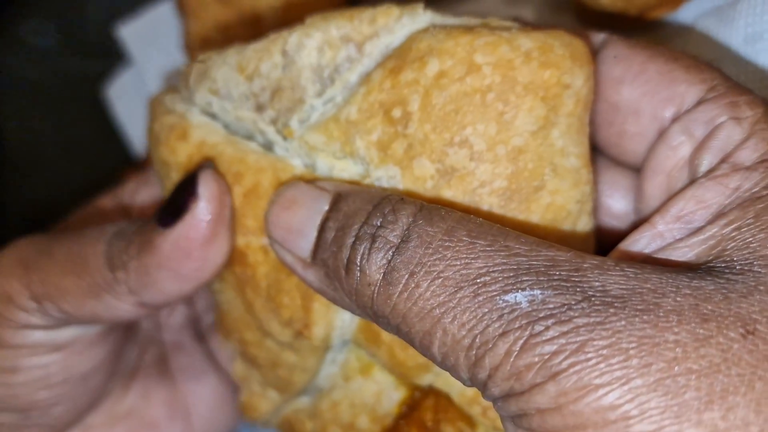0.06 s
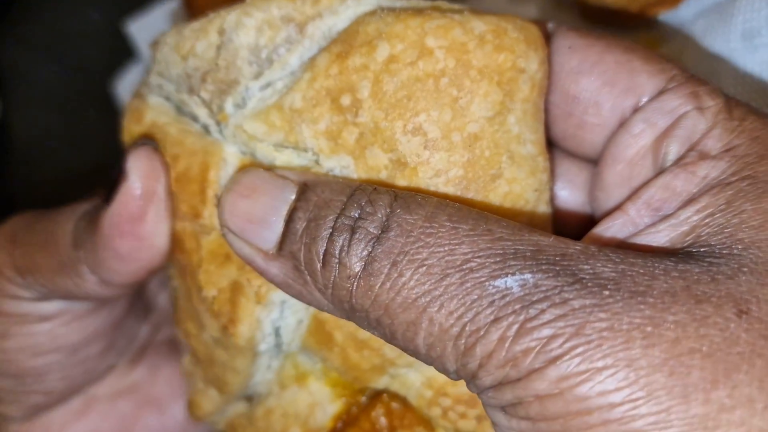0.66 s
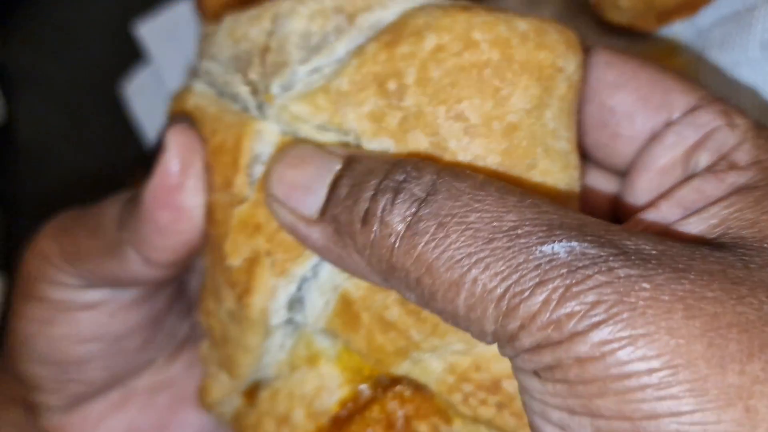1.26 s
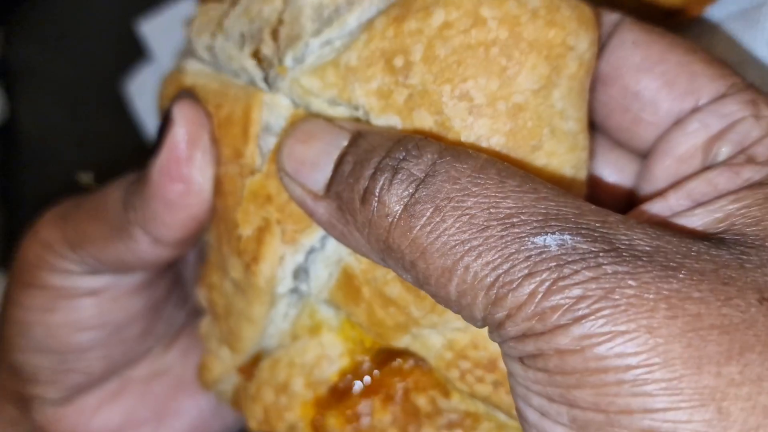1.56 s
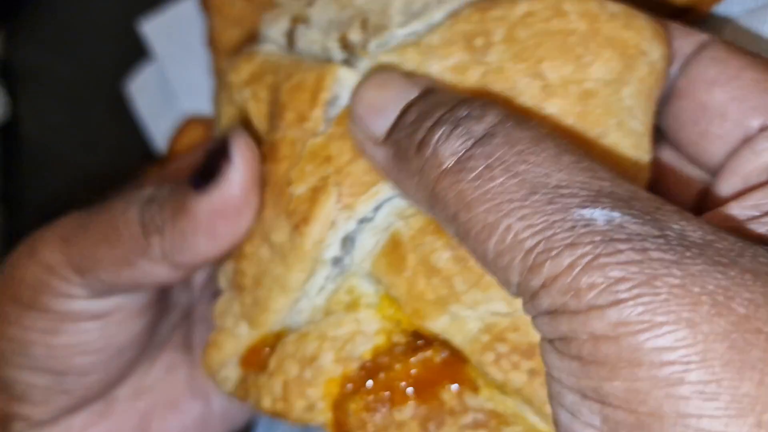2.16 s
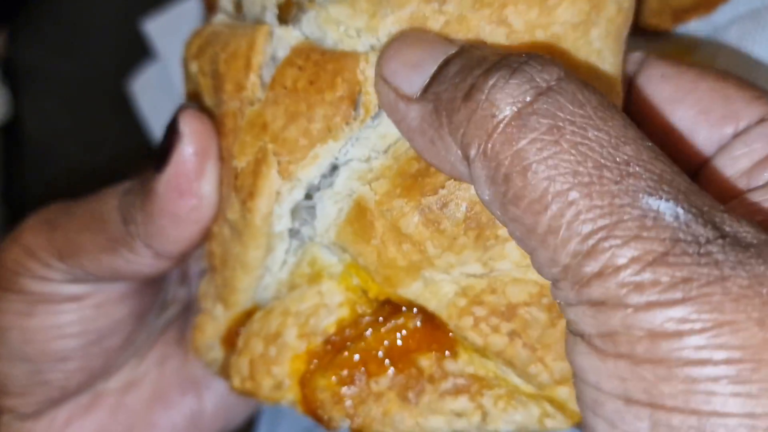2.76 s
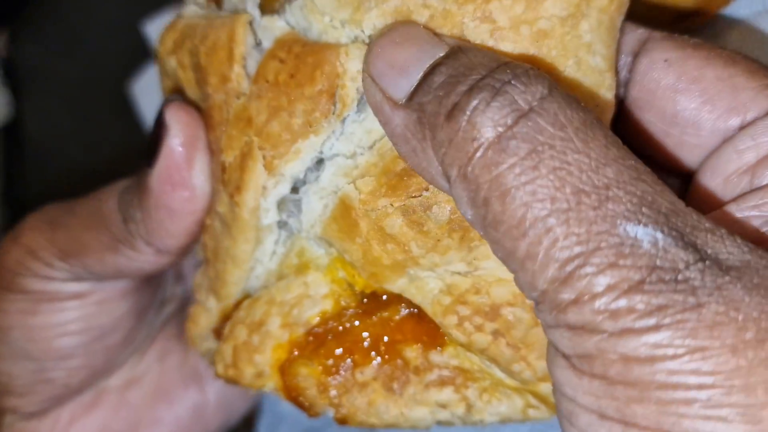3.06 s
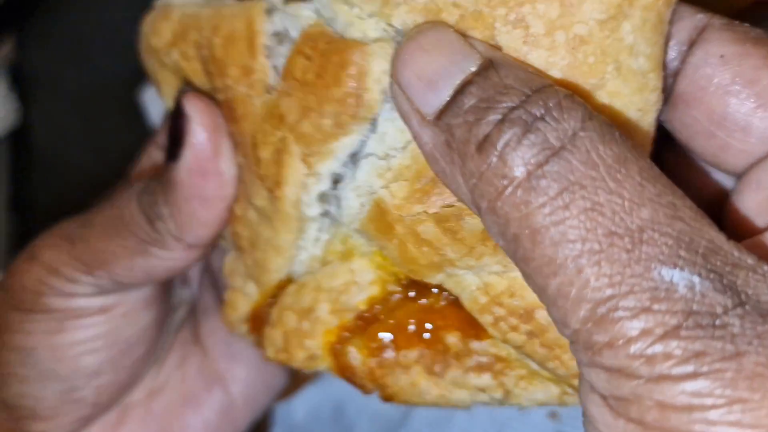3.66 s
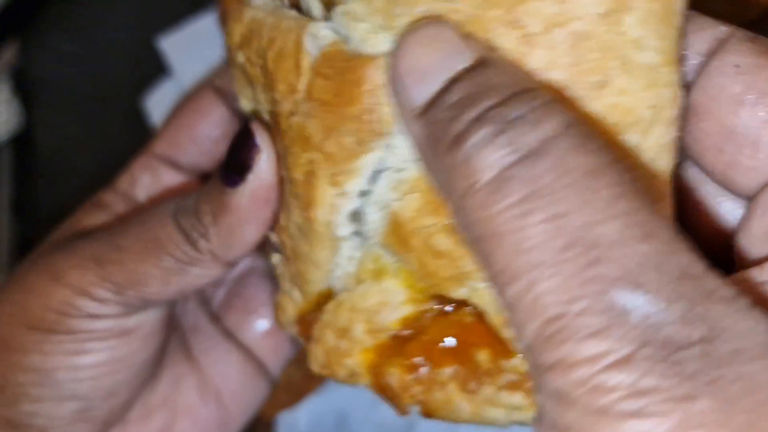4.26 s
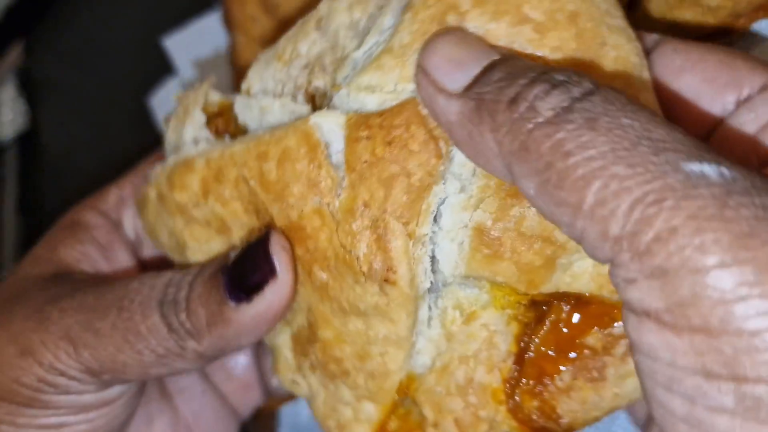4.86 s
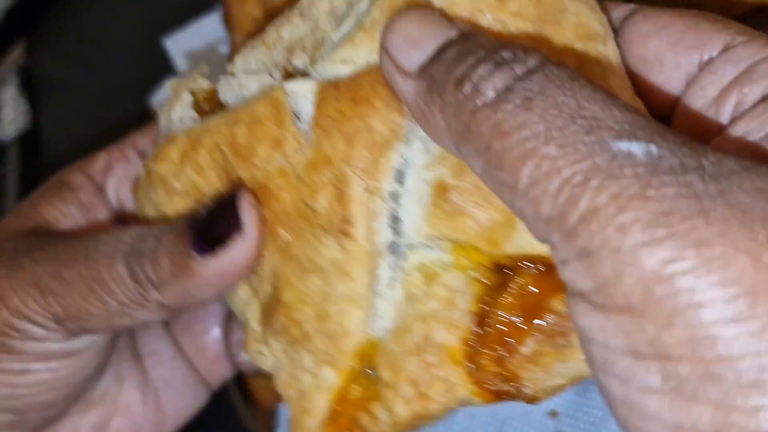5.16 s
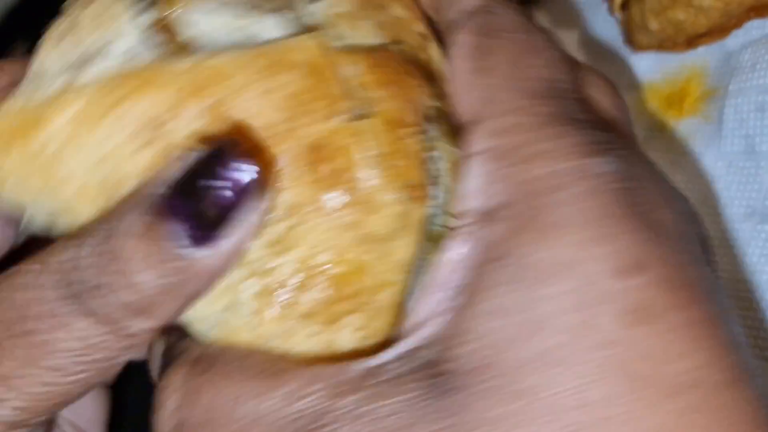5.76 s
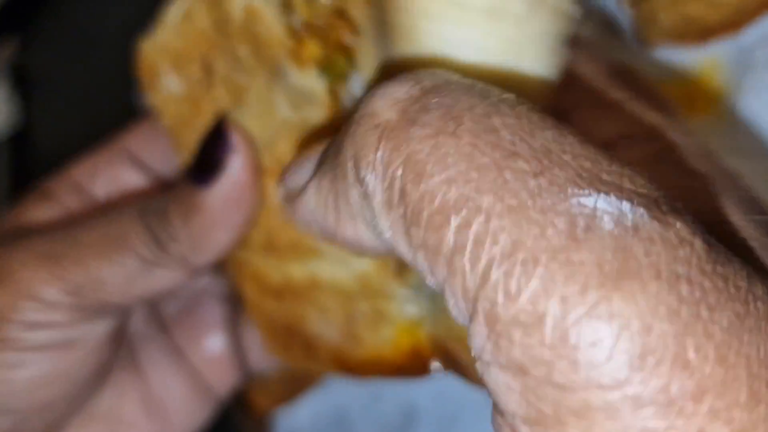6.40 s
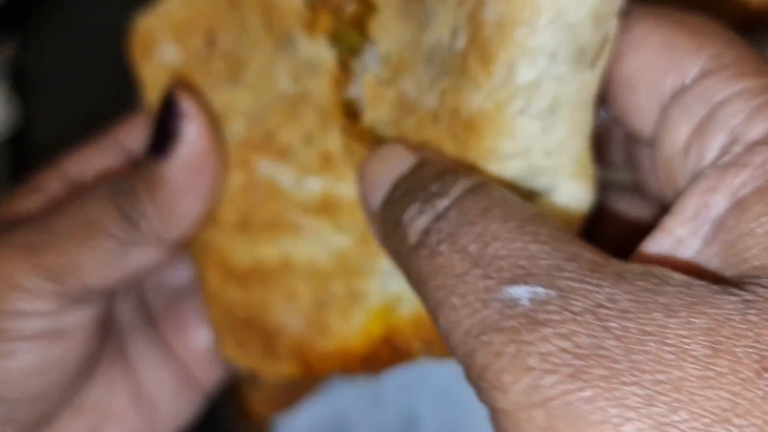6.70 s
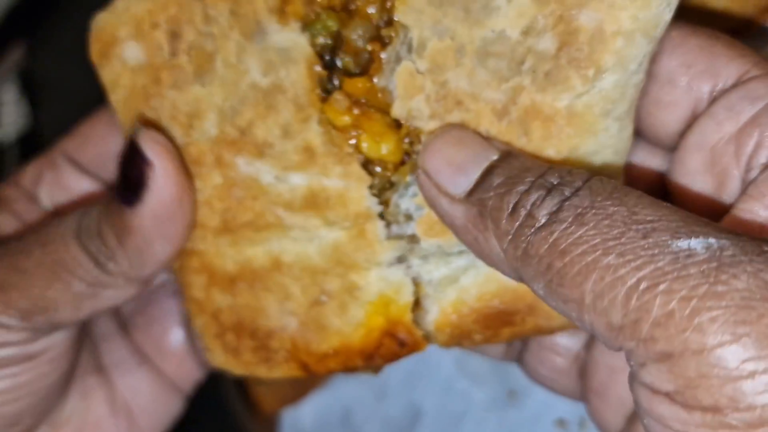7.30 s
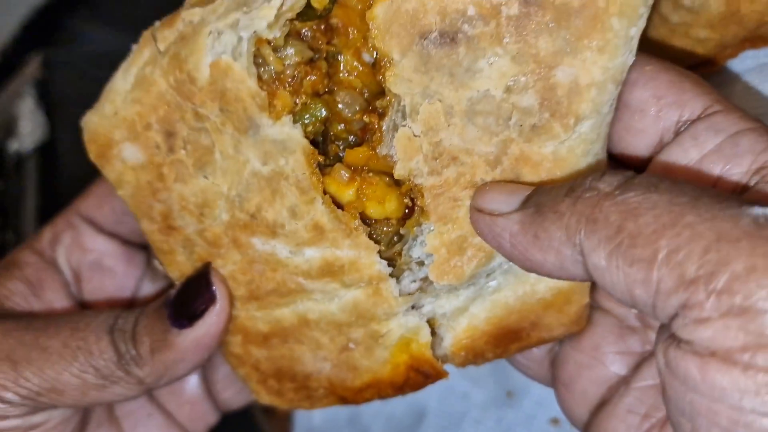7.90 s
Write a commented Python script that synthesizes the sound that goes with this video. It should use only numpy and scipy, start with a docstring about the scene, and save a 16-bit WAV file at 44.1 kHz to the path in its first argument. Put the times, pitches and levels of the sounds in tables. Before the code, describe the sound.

Close crackling of pastry crust and rustling fingers, with soft bumps, a single knock and tiny sticky pops in a quiet, humming kitchen.

```python
"""Hands tear a flaky filled pastry apart near a stereo microphone; an appliance hums in a quiet kitchen.
From the start the crust snaps and sheds flakes, fingers rub over it, and hard walls answer.
From 2.4 s the hands bump softly and skin rasps on the crust; at 3.6 s something knocks once.
From 5.4 s the pastry is turned over with quick brushes and more snaps.
From 6.8 s the moist filling parts in tiny sticky pops."""
import sys
import numpy as np
from scipy import signal
from scipy.fft import rfft, irfft, next_fast_len
from scipy.io import wavfile
from scipy.ndimage import uniform_filter1d

SR = 44100
rng = np.random.default_rng(int(sys.argv[2]) if len(sys.argv) > 2 else 0)


def generate_wav(signal):
    """Clip the signal to [-1, 1] and save it as 16-bit WAV at the path in sys.argv[1]."""
    frames = np.transpose(np.atleast_2d(signal))
    scaled = np.clip(frames, -1, 1) * 32767
    pcm = np.round(scaled).astype(np.int16)
    wavfile.write(sys.argv[1], SR, pcm)


N = 354563
EDGE_HZ = 15560  # upper band limit

# Fingers creeping over the crust. Each row: time in seconds, level in dB.
GRIP = [(0, -51.5), (0.09, -49.5), (0.15, -53), (0.3, -54), (0.5, -47.5), (0.6, -51.5), (0.7, -55),
        (0.9, -48.5), (1.05, -56), (1.2, -54), (1.4, -61), (1.75, -54), (1.95, -60), (2.1, -61),
        (2.48, -64.5), (2.75, -49.5), (2.9, -52.5), (2.98, -56.5), (3.08, -56), (3.25, -51), (3.39, -57.5),
        (3.72, -55.5), (3.82, -53), (4.0, -57), (4.25, -65.5), (5.5, -54), (6.72, -61.5), (7.1, -53),
        (7.65, -54), (7.85, -63), (8.04, -61)]
# Crumbling of the bent crust. Each row: time in seconds, level in dB against the sliding hiss.
CRUMBLE = [(0, -6.5), (1.8, -3), (2.2, -5.5), (2.7, -9), (2.9, -2.5), (3.4, -5), (3.7, -6), (4.1, -9),
           (5.7, -5.5), (6.1, -7), (6.5, -6.5), (7.0, -8.5), (8, -15)]


def gain_of(db):
    return 10 ** (np.asarray(db) / 20)


def unit_rms(x):
    return x / np.sqrt(np.mean(x ** 2) + 1e-20)


def at_hz(points, hz):
    """Interpolates (Hz, value) rows on a log-frequency axis."""
    f, value = np.transpose(points)
    return np.interp(np.log(hz + 1), np.log(f + 1), value)


def follow(points):
    """Interpolates (seconds, value) rows at every sample."""
    return np.interp(np.arange(N) / SR, *np.transpose(points))


def add(mix, start_s, sound):
    part = mix[..., max(round(start_s * SR), 0):][..., :sound.shape[-1]]
    part += sound[..., :part.shape[-1]]


def colour(x, points):
    """Filters x by (Hz, dB) rows; rms 1."""
    size = next_fast_len(N)
    hz = np.fft.rfftfreq(size, 1 / SR)
    return unit_rms(irfft(rfft(x, size) * gain_of(at_hz(points, hz)), size)[..., :N])


def pan(db):
    """Constant-power gains, left over right by db."""
    gains = gain_of(np.array([np.atleast_1d(db), -np.atleast_1d(db)]) / 2)
    return gains / np.sqrt(np.mean(gains ** 2, axis=0))


def drift(smooth_s):
    """Slow random curve of rms 1."""
    width = max(int(smooth_s * SR), 1)
    return unit_rms(uniform_filter1d(uniform_filter1d(rng.standard_normal(N), width), width))


def pair(x, correlation):
    """Makes two independent channels partly alike."""
    return np.array([x[0], correlation * x[0] + np.sqrt(1 - correlation ** 2) * x[1]])


def swell(peak_s, length_s, db, rise_share=0.4, roundness=1.2):
    """Gain curve that rises to a peak and dies away more slowly."""
    near = np.arange(max(int((peak_s - 2 * length_s) * SR), 0), min(int((peak_s + 2 * length_s) * SR), N))
    out, t = np.zeros(N), near / SR - peak_s
    away = abs(t) / (length_s * np.where(t < 0, rise_share, 1 - rise_share))
    out[near] = gain_of(db) * np.exp(-away ** roundness)
    return out


def hum(boom_db=-6.5, waver_rad=0.52, throb_db=2):
    """A motor's wavering lines and the room boom they excite throb unevenly over faint mains hum."""
    # Each row: time in seconds, level in dB.
    motor_level = [(0, -60.5), (0.5, -60.5), (1.2, -66), (1.6, -60.5), (2.3, -58.5), (2.58, -54.5),
                   (3.1, -57), (3.8, -52.5), (5.0, -55), (7.2, -55), (8.04, -52.5)]
    # Each row: frequency in Hz, relative level in dB.
    motor_lines = [(163.7, -0.95), (148.7, -8.5)]
    boom_spectrum = [(90, -58), (125, -15), (145, -1), (164, 1.5), (176, -6), (190, -21), (260, -57)]
    # Each row: frequency in Hz, level in dB.
    mains_lines = [(50, -74), (100, -71.5)]
    t = np.arange(N) / SR

    def tone(hz, db, phase_rad):
        return np.sqrt(2) * gain_of(db) * np.sin(2 * np.pi * (hz * t + rng.random()) + phase_rad)

    motor = sum(tone(hz, db, waver_rad * drift(0.27)) for hz, db in motor_lines)
    boom = gain_of(boom_db) * colour(pair(rng.standard_normal((2, N)), 0.86), boom_spectrum)
    level = gain_of(follow(motor_level) + throb_db * drift(0.033))
    mains = sum(tone(hz, db, 0) for hz, db in mains_lines)
    return (motor + boom) * level * pan(1.8) + mains


def room_tone(hiss_db=-60, whine_db=-72.5):
    """Steady hiss, the appliance's faint fuzzy whine, and swells of deep rumble."""
    # Each row: frequency in Hz, relative level in dB.
    hiss_spectrum = [(15, -36), (35, -1), (70, -0.5), (100, 6), (135, 5.5), (200, 1), (265, -2), (350, -4),
                     (600, -15.5), (1600, -17.5), (2300, -12.5), (4500, -37), (7500, -11.5), (9700, -38),
                     (13000, -14)]
    rumble_spectrum = [(10, -18), (30, -8), (55, -10), (100, -8), (250, -42), (1000, -80)]
    # Each row: frequency in Hz, left-right correlation.
    hiss_correlation = [(30, 0.71), (160, 0.86), (400, 0.95), (1000, 0.1), (3000, 0.038), (16000, 0.046)]
    # Each row: centre in Hz, width in Hz, relative level in dB.
    whine_peaks = [(289, 4.7, 0.5), (349.5, 14, 2), (426, 7.1, 0.5), (813, 89, 1.5), (1000, 39, -32),
                   (1285, 21, -15), (2120, 120, -3), (2310, 68, -10)]
    # Each row: peak time in seconds, length in seconds, level in dB.
    rumble_swells = [(1.275, 0.17, -59.5), (2.87, 0.58, -62.5), (3.537, 0.16, -59), (4.217, 0.75, -64)]
    size = next_fast_len(N)
    hz = np.fft.rfftfreq(size, 1 / SR)
    noise_bins = pair(rfft(rng.standard_normal((2, size))), at_hz(hiss_correlation, hz))
    hiss = gain_of(hiss_db) * colour(irfft(noise_bins, size)[:, :N], hiss_spectrum)
    peaks = sum(gain_of(db) / np.sqrt(width_hz) / (1 + (2 * (hz - centre_hz) / width_hz) ** 2)
                for centre_hz, width_hz, db in whine_peaks)
    whine = unit_rms(irfft(rfft(rng.standard_normal((2, size))) * peaks, size)[:, :N])
    rumble = colour(pair(rng.standard_normal((2, N)), 0.98), rumble_spectrum)
    return hiss + gain_of(whine_db) * whine + rumble * sum(swell(*row) for row in rumble_swells)


def finger_levels(grip_dough_db=-13, grip_bright_db=-0.06, uneven_db=1.95):
    """Grip and strokes add in power; returns crust level, dough level and brightness, all in dB."""
    # Each row: peak time in seconds, length in seconds, level in dB, dough against it in dB,
    # brightness in dB.
    strokes = [(0.167, 0.027, -49, -20, -12), (0.266, 0.054, -46.5, -21, -1),
               (0.353, 0.037, -41, -18, -1.5), (0.42, 0.086, -47, -18, 3), (0.482, .03, -47, -28, 12),
               (0.56, 0.044, -47.5, -28, -4), (0.637, 0.11, -45, -28, 2), (0.843, 0.096, -44, -32, 6),
               (1.16, 0.11, -55.5, -11, -4), (1.527, 0.19, -56, -6.5, 8), (2.216, 0.16, -47, -14.5, -1),
               (2.385, 0.11, -53.5, -20, -4.5), (2.604, 0.14, -43.5, -13.5, 1.5),
               (2.854, 0.2, -55.5, -27, 1), (3.277, 0.061, -49, -20, 6), (3.593, 0.093, -51, -5, 4),
               (3.683, .04, -52, -14, 0), (4.09, 0.22, -54.5, -22, 4.5), (4.19, 0.049, -51, -9.5, 1),
               (4.343, 0.21, -48.5, -29, -2), (4.593, 0.15, -47.5, -14.5, -2),
               (4.725, 0.13, -51.5, -10, 3.5), (4.879, 0.072, -47, -20, -0.5),
               (5.038, 0.18, -49.5, -18, 0.5), (5.163, 0.07, -52.5, -18, 0), (5.244, 0.099, -49.5, -7, 2),
               (5.393, 0.037, -41, -11.5, 4.5), (5.563, 0.28, -53, -4.5, 17), (5.683, 0.06, -44, -23, 8),
               (5.805, 0.071, -40, -9.5, 7), (5.855, 0.08, -43.5, -17, -2), (6.051, 0.11, -43, -17, 0.5),
               (6.14, 0.085, -44.5, 0.5, 7.5), (6.238, 0.03, -50.5, -22, 5),
               (6.33, 0.11, -47.5, -11.5, 9.5), (6.41, 0.058, -52.5, -20, -3),
               (6.482, 0.11, -37.5, -7, 6.5), (6.53, 0.1, -36.5, -16, 4), (6.604, 0.099, -43.5, -7, -0.5),
               (6.76, 0.055, -49, -10, 0), (6.839, 0.058, -43, -21, -5.5), (6.886, .04, -49, -11, 0),
               (6.998, 0.17, -52.5, -0.5, 2), (7.24, 0.13, -54, -22, -7), (7.465, 0.25, -52, -13, 6.5),
               (7.702, 0.12, -57, -0.5, 16)]
    crust = gain_of(follow(GRIP) + uneven_db * drift(0.037)) ** 2
    dough, bright = crust * gain_of(grip_dough_db) ** 2, crust * grip_bright_db
    for peak_s, length_s, db, dough_db, bright_db in strokes:
        power = swell(peak_s, length_s, db) ** 2
        crust += power
        dough += power * gain_of(dough_db) ** 2
        bright += power * bright_db
    return 10 * np.log10(crust), 10 * np.log10(dough), bright / crust


def crumbs(per_s=650, decay_s=0.00015, size=64):
    """Countless small flakes give way, each at its own pitch; hard bending frees larger ones."""
    t, starts = np.arange(size) / SR, np.flatnonzero(rng.random(N - size) < per_s / SR)
    pitch, strength, left, right = rng.random((N, 4))[starts].T[..., None]
    spread_db = np.maximum(4 + 0.26 * follow(CRUMBLE)[starts, None], 0)
    level = gain_of(spread_db * np.minimum(-np.log(strength), 3))
    ring = np.sin(2 * np.pi * (pitch * EDGE_HZ * t + np.array([left, right])))
    ticks = level * np.exp(-t / decay_s) * ring
    where = (starts[:, None] + np.arange(size)).ravel()
    return unit_rms(np.array([np.bincount(where, channel.ravel(), N) for channel in ticks]))


def shifting_colour(x, depth_db=2.0):
    """The rubbing hiss flickers randomly in colour from moment to moment."""
    frames = dict(nperseg=512, noverlap=384)
    bins = signal.stft(x, **frames)[2]
    flicker = uniform_filter1d(rng.standard_normal(bins.shape[1:]), size=7, axis=0)
    flicker = unit_rms(uniform_filter1d(flicker, size=12, axis=1))
    return unit_rms(signal.istft(bins * gain_of(depth_db * flicker), **frames)[1][:, :N])


def rustle(dough_trim_db=-3, flutter_db=1.06, split_hz=5000):
    """Skin hisses over dry crust and rubs dully on dough; where the crust bends, it crumbles too."""
    # Each row: frequency in Hz, relative level in dB.
    crust_spectrum = [(900, -13), (1650, -12), (2100, -3.5), (2900, -6.5), (3600, -1), (4500, -1),
                      (5200, 0.5), (6000, 0.5), (7400, 3), (9700, -4), (12400, 1.5), (14500, -0.5),
                      (16000, -4)]
    dough_spectrum = [(120, -12), (330, -4.5), (620, -7), (830, -4), (1040, -5.5), (1330, -1), (1650, -6),
                      (2100, 0.5), (2900, -4), (3600, -2.5), (7000, -31)]
    # Microphone ports. Each row: frequency in Hz, pan in dB.
    port_balance = [(200, 6), (600, -4.5), (1200, 16), (2300, 8), (4500, -1), (8000, 1.5), (15000, -6.5)]
    # Each row: time in seconds, pan in dB.
    finger_pan = [(0, 4), (2.6, 2), (5.8, 3), (6.15, -2.5), (6.33, 3), (6.52, -2), (6.8, 1.5), (8, 3.5)]
    crust_db, dough_db, bright_db = finger_levels()
    slide = gain_of(flutter_db * drift(0.013)) * pair(rng.standard_normal((2, N)), 0.084)
    crumble = gain_of(follow(CRUMBLE))
    friction = shifting_colour((slide + crumble * crumbs()) / np.hypot(1, crumble))
    crust = colour(friction, crust_spectrum)
    # a light, quick stroke hisses; a pressing one scrapes lower
    scrape = signal.sosfiltfilt(signal.butter(3, split_hz, fs=SR, output="sos"), crust)
    hiss = crust - scrape
    crust = hiss * gain_of(crust_db + bright_db / 2) + scrape * gain_of(crust_db - bright_db)
    dough = colour(friction, dough_spectrum) * gain_of(dough_db + dough_trim_db)
    size = next_fast_len(N)
    ports = pan(at_hz(port_balance, np.fft.rfftfreq(size, 1 / SR)))
    return irfft(rfft(crust + dough, size) * ports, size)[:, :N] * pan(follow(finger_pan))


def faint_snaps(over_grip_db=10.5, level_spread_db=1, trait_spread_db=5, tries=240):
    """Rows for snaps(): small flakes break by chance as the crust bends, louder under a busy grip."""
    # Mean body, crunch, top edge and pan in dB.
    mean_traits = [-20, -12, 7, -7]
    start_s, chance = rng.random((tries, 2)).T * [[N / SR], [1]]
    scatter = rng.standard_normal((tries, 5))
    per_s = 7 * gain_of(np.interp(start_s, *np.transpose(CRUMBLE))) ** 2
    db = np.interp(start_s, *np.transpose(GRIP)) + over_grip_db + level_spread_db * scatter[:, 0]
    traits = mean_traits + trait_spread_db * scatter[:, 1:]
    return list(np.column_stack([start_s, db, traits])[chance < per_s * N / SR / tries])


def snaps(rise_s=0.00031, decay_s=0.00044, run_up_s=0.0011, trim_db=1.12, size=1024, max_snaps=160):
    """Each crust snap is a brief run of tiny fractures, coloured by the size of the flake."""
    # Each row: start in seconds, level in dB, body, crunch and top edge in dB against the
    # third band, pan in dB.
    loud_snaps = [(0.0232, -34, -11, 3, -2.5, 4), (0.037, -42, -22, -3.5, 0, 6), (0.1, -40, -21, 7, -6, 5),
                  (0.1113, -38, -29, 12, 2, 1), (0.1602, -31, -5, 4, 12, 4), (0.162, -35, -4, 3, 2, 11),
                  (0.1683, -38.5, -14, 15, -3, -6), (0.177, -32.5, -9, 20, -12, 19),
                  (0.1919, -35.5, -11, 2, -5, 0), (0.2355, -27, -13, 9, 10.5, -3),
                  (0.2918, -41, -21, -6, 7, 9), (0.303, -42, -31, 9, -12, 6), (0.3183, -36, -13, -5, -3, 6),
                  (0.360, -34, -19, -3, 0, 4), (0.368, -28.5, -15, -6, -4, 7),
                  (0.394, -38, -24, -8, -11, 6), (0.4742, -32, -16, 2.5, -2, 5),
                  (0.5218, -27.5, -22, -12, -6, 0), (0.569, -34.5, -8, 0, 0, 5), (0.574, -31, -8, 9, 6, 3),
                  (0.5842, -33, -24, 3, 4, -1), (0.586, -28, -16, 4, 5, 4), (0.6341, -39.5, -1, 8, -5, 15),
                  (0.643, -42, -29, 2, -9, -6), (0.651, -40, -17, 8, -2, 5),
                  (0.742, -37.5, -40, -6, -8, 12), (0.748, -39, -40, -1, -13, 5),
                  (0.757, -36, -24, -2, 12, -2), (0.787, -39, -23, 5, 2, 4), (0.808, -40, -10, 13, 0, 12),
                  (0.8225, -35, -20, -3, -6, 1), (0.827, -16.5, -17, 9.5, 6, 0),
                  (0.8285, -31, -2, 4, 5, 16), (0.8578, -31, -27, -6, -5, 3), (0.895, -35.5, -24, 16, 3, 0),
                  (0.9092, -33, -19, 4, -14, 2), (0.9475, -38, -25, 19, 5, 1),
                  (0.968, -42, -31, -12, -12, 0), (1.0402, -52, -3, -12, -10, 9),
                  (1.092, -43.5, -9, 1, 2, 7), (1.130, -44.5, -27, -10, -14, 10),
                  (1.1387, -41, -7, -3, -13, 12), (1.169, -44, -29, -21, -6, 9),
                  (1.1802, -45, -19, -8, 5, 8), (1.2087, -35, -10, -2, -11, 3),
                  (1.212, -39, 0.5, -6, -12, 9), (1.2707, -49, -22, -11, -3, 8),
                  (1.328, -45, -11, -7, -15, 8), (1.391, -40, -33, -22, 3, 2),
                  (1.424, -48, -22, -13, -4, 7), (1.4621, -49, -14, -8, 6, 4), (1.471, -46.5, 4, 4, -8, 6),
                  (1.488, -48, -2, -10, -13, 3), (1.522, -43, 2, -2, -5, 9), (1.5621, -50, -19, -12, -2, 9),
                  (1.5924, -48, -11, -14, -8, 7), (1.665, -37, -3, 5.5, -6, 18),
                  (1.6987, -37, -13, 1, 0, 10), (1.768, -37.5, -17, -9, 0, 4), (1.813, -42, -5, 2, -5, 4),
                  (1.829, -41.5, 1, -1, -3, 5), (1.8503, -42.5, -15, -7, 4, 9),
                  (1.9012, -49, -24, -14, -5, 11), (1.970, -46, -17, -7, 4, 8),
                  (1.9915, -49, -12, 0, 7, 10), (2.0125, -49, -20, -7, -7, 10),
                  (2.023, -45, -21.5, -9, -9, 12), (2.086, -46, -23, -22, -18, 6),
                  (2.1463, -51, -18, -6, -8, 8), (2.52, -45, -2, 4, -9, 7), (2.824, -40, -33, -10, -17, -3),
                  (2.8524, -40, -28, -5, -11, -1), (2.86, -41, -31, -5, -10, -4),
                  (2.865, -38, -22, -1, -3, -1), (2.9113, -41.5, -10, 4, -1, 8),
                  (2.9993, -42, -35, 10, 2, 8), (3.016, -46, -30, -17, 6, -3),
                  (3.026, -38.5, -20, 10, 8, 5), (3.0373, -36, -37, -7, -4, 1),
                  (3.1019, -45, -15, -9, 6, 7), (3.144, -38, -19, -5, 5, 6), (3.167, -34.5, -51, 1, -1, 7),
                  (3.1744, -32.5, -35, -7, -3, 0), (3.189, -35.5, -52, -9, -4.5, 0),
                  (3.221, -41, -36, -12, -5, -3), (3.2347, -35, -35, 4, 8, 1), (3.282, -35, -9, -3, 1, 18),
                  (3.353, -40, -8, -14, -6, 15), (3.5011, -47, -12, -3, -9, 7),
                  (3.547, -51, -32, -12, -5, 4), (3.620, -41, 1, -3, -14, 0),
                  (3.788, -43.5, -10, -4, -8, 11), (3.8346, -45, -27, -8, -30, 13),
                  (3.851, -48, -25, -14, -22, 9), (3.928, -43, -33, 11, 2, 11),
                  (4.3345, -36.5, -43, -14, -9, 3), (4.3968, -46.5, -23, -2, -7, 4),
                  (4.841, -47, -10, 15, -16, 5), (5.2968, -39, -9, -15, -7, 8),
                  (5.38, -26, -17, -1, 12.5, 4), (5.783, -36.5, -4, 0, 1, 11), (5.8595, -42, -2, 10, 0, 6),
                  (5.943, -45.5, 10, 17, -12, 15), (5.950, -46, 3, 14, -10, 10),
                  (5.966, -43, -27, -13, -5, 1), (6.015, -47, -3, 0, 0, 9), (6.1315, -37.5, 20, 8, 10, 1),
                  (6.4496, -40, 6, 2, 3, 10), (6.4574, -24.5, -30, -3, 15, -9),
                  (6.538, -39, -21, -8, 2, -8), (6.697, -49, 8, 12, -8, 10), (6.832, -41.5, 0, 5, 0, 4),
                  (7.0367, -39, 8, 5, 0.5, 11), (7.079, -43.5, -10, 15, -12, 6),
                  (7.145, -42.5, -37, 7, -16, 11), (7.3261, -45.5, -3, -5, 8, -7),
                  (7.947, -52, -25, -5, -15, 4)]
    # Four bands: body, crunch, reference, top edge.
    centres_hz = [1000, 2700, 6800, 13000]
    widths_hz = [1200, 2800, 5500, 6500]
    # Ring shared by all flakes. Each row: frequency in Hz, gain in dB.
    flake_ring = [(600, 1.5), (720, -6), (850, 2.5), (1100, -3), (1350, 2.5), (1800, -3.5), (2230, 6),
                  (2650, -3), (3400, -3.5), (3900, 1), (4800, -1), (5600, 4), (7500, 7), (9700, 0),
                  (12800, 6.5), (16000, 4.5)]
    out, t, hz = np.zeros((2, N)), np.arange(size) / SR, np.fft.rfftfreq(size, 1 / SR)
    lead_s = .002
    age_s = np.maximum(t - lead_s, 0)
    envelope = (1 - np.exp(-age_s / rise_s)) ** 2 * np.exp(-age_s / decay_s)
    envelope += .11 * np.exp(-abs(t - lead_s) / run_up_s)  # the layer gives just before it breaks
    fractures = rng.standard_normal((max_snaps, 2, size))
    for (start_s, db, body, crunch, top, pan_db), fracture in zip(loud_snaps + faint_snaps(), fractures):
        density_db = np.array([body, crunch, 0, top]) - 10 * np.log10(widths_hz)
        tint = [(450, density_db[0] - 12), *zip(centres_hz, density_db)]
        bins = rfft(pair(fracture, 0.14) * envelope)
        bins /= np.sqrt(abs(bins)) + 1e-9  # a brittle fracture is broad, with no strong pitch
        burst = irfft(bins * gain_of(at_hz(tint, hz) + at_hz(flake_ring, hz)))
        burst /= np.sqrt(np.sum(burst ** 2, axis=1, keepdims=True) / (lead_s * SR))
        add(out, start_s - lead_s, gain_of(db + trim_db) * pan(pan_db) * burst)
    return out


def wall_echo(x, onset_s=0.00036, tails=3):
    """Dense reflections from near walls; three slowly crossfaded tails keep the echo free of ringing."""
    # Each row: frequency in Hz, t60 in seconds.
    room_t60 = [(150, 0.28), (800, 0.18), (2500, 0.16), (7000, 0.2), (15000, 0.14)]
    out, blend = np.zeros((2, N)), (x + .5 * x[::-1]) / np.hypot(1, .5)
    for k in range(tails):
        hz, t, bins = signal.stft(rng.standard_normal((2, SR // 2)), SR, nperseg=256)
        decay = gain_of(-60 * t / at_hz(room_t60, hz)[:, None])
        tail = signal.istft(bins * decay, SR, nperseg=256)[1]
        tail *= np.clip(np.arange(tail.shape[1]) / SR / onset_s - .5, 0, 1)
        share = np.sqrt(2 / tails) * np.cos(2 * np.pi * np.arange(N) / SR + np.pi * k / tails)
        out += signal.oaconvolve(blend * share, tail / np.linalg.norm(tail[0]), axes=1)[:, :N]
    return out


def bumps(rise_s=0.00083, thud_hz=134.5, thud_t60_s=0.076, puff_db=-7):
    """The grip shifts: a damped thud, the pastry's hollow note and a puff of squashed dough."""
    # Each row: start in seconds, thud in dB, note in dB, note pitch in Hz, note t60 in seconds.
    hand_bumps = [(2.449, -41, -53, 300, .07), (2.464, -55, -46.5, 322, .08), (2.489, -48, -40.5, 322, .08),
                  (2.499, -50, -46.5, 240, .1), (2.513, -38.5, -51, 352, 0.072),
                  (2.533, -56, -48, 316, .08), (2.551, -40.5, -49, 188, .14),
                  (3.478, -49, -42.5, 293, 0.046), (3.630, -43.5, -59, 229, .06),
                  (3.987, -51, -44, 440, .028), (4.194, -50, -47, 520, 0.032),
                  (4.217, -43, -49, 213, 0.063), (5.121, -54, -54, 420, .06), (5.156, -50, -52, 338, 0.084),
                  (5.309, -45, -56, 295, .06), (5.721, -62, -39.5, 392, 0.052), (6.495, -51, -40, 370, .05)]
    out, t = np.zeros(N), np.arange(SR // 2) / SR

    def ring(db, hz, t60_s):
        return gain_of(db - 60 * t / t60_s) * np.sin(2 * np.pi * hz * t)

    attack = (1 - np.exp(-t / rise_s)) ** 2
    for start_s, thud_db, note_db, hz, t60_s in hand_bumps:
        band = signal.butter(4, [thud_hz, 1.36 * hz], "bandpass", fs=SR, output="sos")
        puff = unit_rms(signal.sosfilt(band, rng.standard_normal(len(t))))
        puff *= gain_of(note_db + puff_db - 60 * t / t60_s)
        add(out, start_s, attack * (ring(thud_db, thud_hz, thud_t60_s) + ring(note_db, hz, t60_s) + puff))
    return out * pan(0)


def resonate(x, hz, width_hz):
    """A resonance that follows the curve hz."""
    turn, pole = np.exp(2j * np.pi * np.cumsum(hz) / SR), np.exp(-np.pi * width_hz / SR)
    return 2 * (turn * signal.lfilter([1 - pole], [1, -pole], x / turn)).real


def rasps(slips_per_s=700, spread_db=13.5, width_share=0.29):
    """Uneven slips of a fingertip ring the crust; the note glides as the finger travels."""
    # Each row: peak time in seconds, length in seconds, level in dB, pitch in Hz, glide in octaves/s.
    catches = [(2.766, 0.076, -59, 2600, -2), (2.874, 0.031, -55, 4100, -2), (4.368, 0.099, -63, 3500, 4),
               (4.885, 0.042, -61.5, 3820, 4), (5.56, .04, -66, 7060, 1), (5.806, 0.053, -51, 6070, -8),
               (5.86, 0.055, -52, 2010, 1), (5.867, 0.059, -54, 4540, -10),
               (6.147, 0.063, -48.5, 3480, -1.5), (6.461, 0.07, -47, 3450, 2),
               (6.504, 0.055, -50.5, 1110, 6), (6.52, 0.064, -51, 5750, 6), (6.605, 0.058, -48, 3680, 0)]
    out = np.zeros((2, N))
    for peak_s, length_s, db, hz, octaves_per_s in catches:
        gain = swell(peak_s, length_s, db)
        at = np.flatnonzero(gain)
        slipping = rng.random(len(at)) < slips_per_s / SR
        slips = slipping * gain_of(spread_db * np.minimum(rng.exponential(1, len(at)), 2))
        note_hz, width_hz = hz * 2 ** (octaves_per_s * (at / SR - peak_s)), width_share * hz
        drive = slips * pair(rng.standard_normal((2, len(at))), 0.11)
        note = resonate(resonate(drive, note_hz, width_hz), note_hz, width_hz)
        out[:, at] += gain[at] * unit_rms(note)
    return out * pan(2)


def knock(start_s=3.5613, level_db=-25.5, tick_db=1, tick_t60_s=0.016):
    """One hard knock: a sharp tick and a short hollow ring."""
    # Each row: frequency in Hz, relative level in dB, t60 in seconds.
    modes = [(356, -15.5, 0.048), (465, -5, 0.019), (596, -1.5, 0.014), (860, 2, 0.011), (1054, 4, 0.014),
             (1330, 0.5, 0.014), (1620, 1, 0.0091), (2270, -0.5, 0.01), (3540, -5, 0.0081),
             (5420, 7.5, 0.0035), (6500, 3, 0.0045)]
    out, t = np.zeros((2, N)), np.arange(SR // 5) / SR
    # neighbouring modes swing in opposite directions
    ring = sum((-1) ** k * gain_of(db - 60 * t / t60_s) * np.sin(2 * np.pi * hz * t)
               for k, (hz, db, t60_s) in enumerate(modes))
    tick = gain_of(tick_db - 60 * t / tick_t60_s) * uniform_filter1d(rng.standard_normal((2, len(t))), 2)
    add(out, start_s, gain_of(level_db) * (ring * pan(0.5) + tick * pan(4)))
    return out


def swishes(rise_s=0.0057):
    """A hand brushes past as the pastry is turned: a band of hiss that starts quickly and fades."""
    # Each row: start in seconds, level in dB, low edge in Hz, high edge in Hz, decay in seconds.
    brushes = [(5.375, -33.5, 8500, 15900, 0.012), (5.764, -38, 4470, 7250, 0.062),
               (6.301, -45, 5960, 8800, 0.041)]
    out, t = np.zeros((2, N)), np.arange(SR // 4) / SR
    for start_s, db, low_hz, high_hz, decay_s in brushes:
        band = signal.butter(3, [low_hz, high_hz], "bandpass", fs=SR, output="sos")
        hiss = unit_rms(signal.sosfilt(band, rng.standard_normal((2, len(t)))))
        envelope = (1 - np.exp(-t / rise_s)) ** 2 * np.exp(-t / decay_s)
        add(out, start_s, gain_of(db) * envelope * hiss * pan(4))
    return out


def filling(pop_hz=2270, spread_octaves=0.21, decay_s=0.0012, spread_db=2.5, pops=300):
    """Wet strands let go one by one; each pop rings briefly at its own pitch."""
    # Each row: time in seconds, level in dB.
    pull_level = [(6.849, -88), (6.98, -60), (7.09, -63), (7.18, -84), (7.24, -63), (7.4, -71), (7.55, -70),
                  (7.68, -67), (7.8, -68), (7.9, -76)]
    out, t = np.zeros((2, N)), np.arange(256) / SR
    first_s = pull_level[0][0]
    span_s = pull_level[-1][0] - first_s
    for (when, strength, left, right), pitch in zip(rng.random((pops, 4)), rng.standard_normal(pops)):
        hz = pop_hz * 2 ** (spread_octaves * pitch)
        ring = np.sin(2 * np.pi * hz * t + np.pi * np.array([[left], [right]]))
        level = gain_of(spread_db * min(-np.log(strength), 3))
        add(out, first_s + when * span_s, level * np.exp(-t / decay_s) * ring)
    out = unit_rms(out) * np.sqrt(span_s * SR / N)  # rms 1 within the span
    return out * gain_of(follow(pull_level)) * pan(5)


def scene(right_delay_s=.00028):
    """Close sounds, which reach the left port first, plus their echo and the background."""
    # Each row: sound, echo send in dB.
    sources = [(snaps(), -5), (rustle() + swishes() + rasps() + filling(), -7),
               (knock(), -7), (bumps(), -9)]
    direct = sum(x for x, _ in sources)
    direct[1] = np.interp(np.arange(N) - round(right_delay_s * SR), np.arange(N), direct[1])
    send = sum(gain_of(db) * x for x, db in sources)
    return direct + wall_echo(send) + hum() + room_tone()


def record(dry):
    """The recorder's band limit."""
    lowpass = signal.firwin(255, EDGE_HZ, window=("kaiser", 8), fs=SR)
    return signal.oaconvolve(dry, lowpass[None], "same")


dry = scene()
out = record(dry)
generate_wav(out)
```